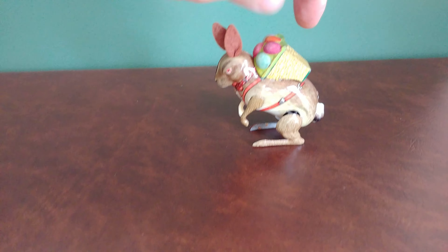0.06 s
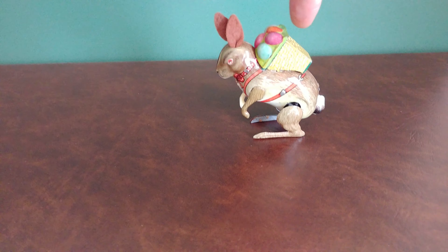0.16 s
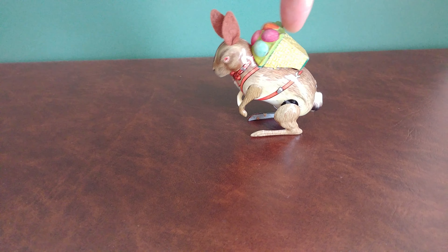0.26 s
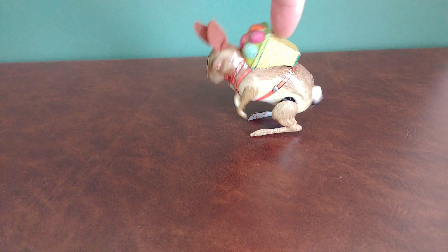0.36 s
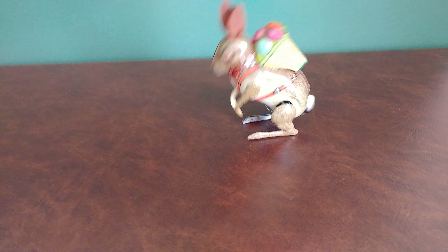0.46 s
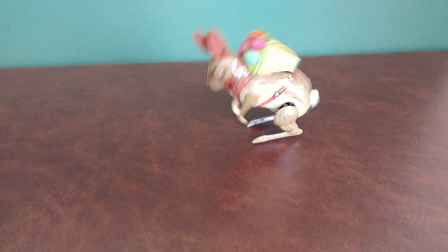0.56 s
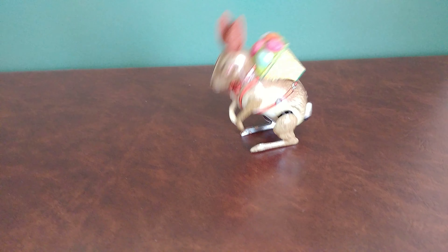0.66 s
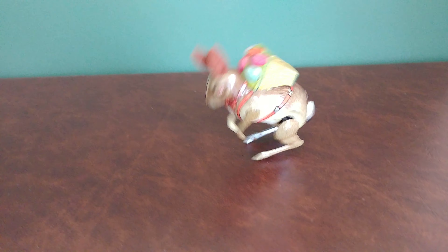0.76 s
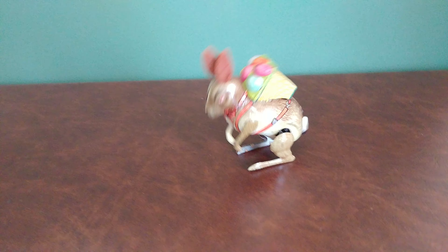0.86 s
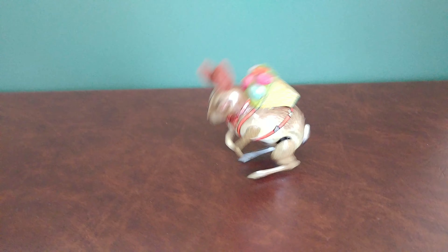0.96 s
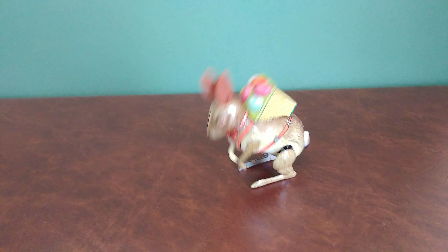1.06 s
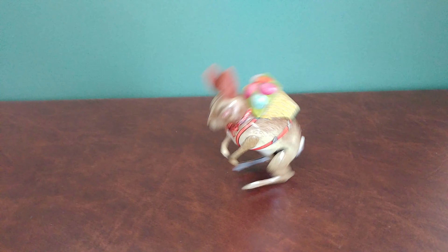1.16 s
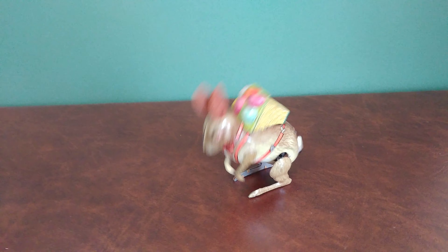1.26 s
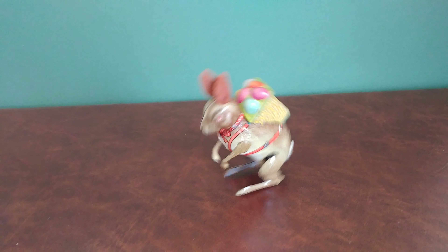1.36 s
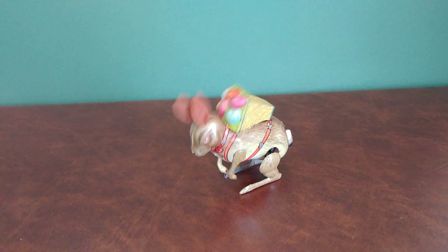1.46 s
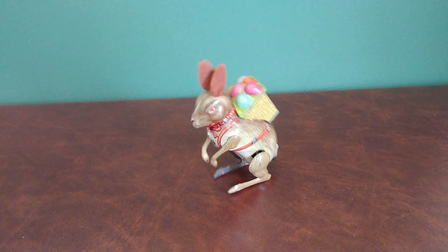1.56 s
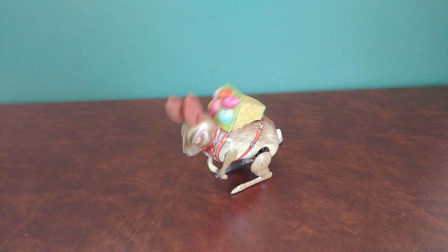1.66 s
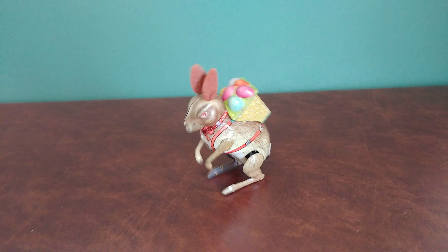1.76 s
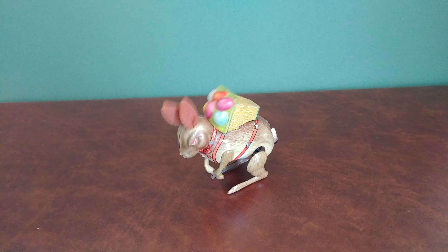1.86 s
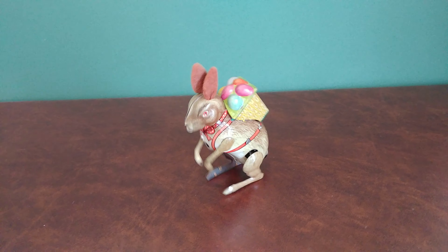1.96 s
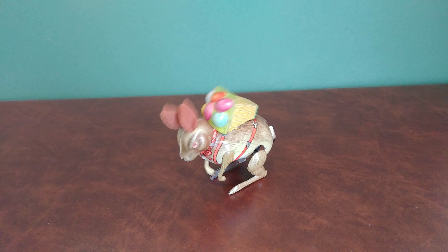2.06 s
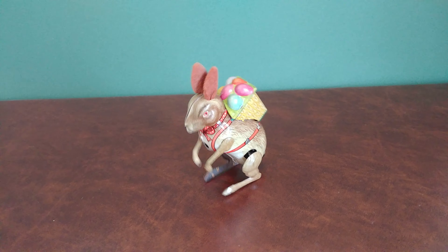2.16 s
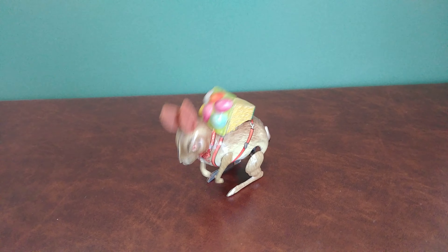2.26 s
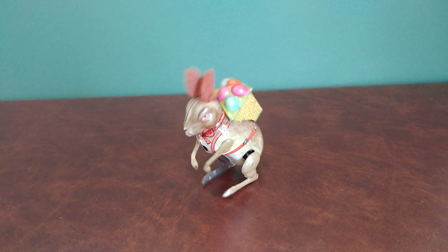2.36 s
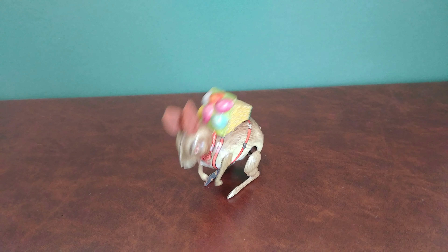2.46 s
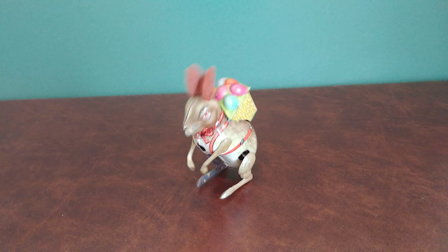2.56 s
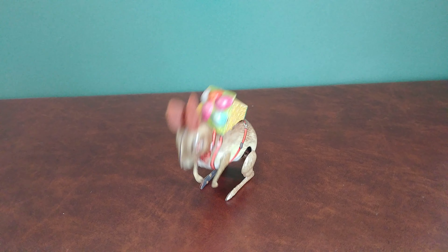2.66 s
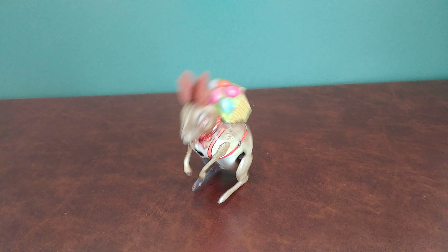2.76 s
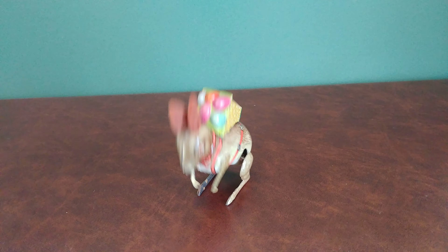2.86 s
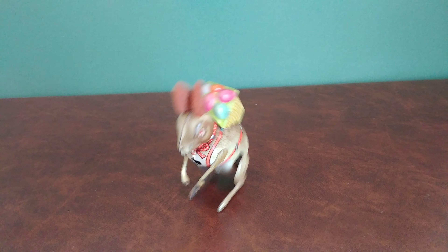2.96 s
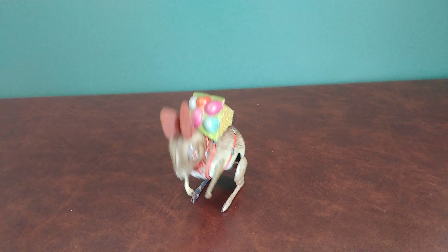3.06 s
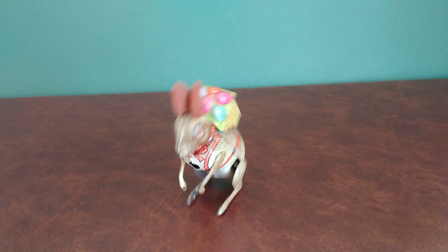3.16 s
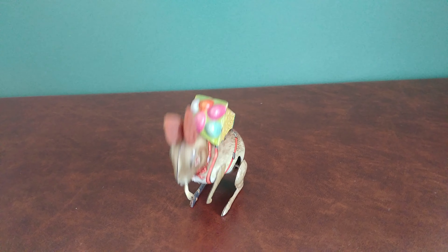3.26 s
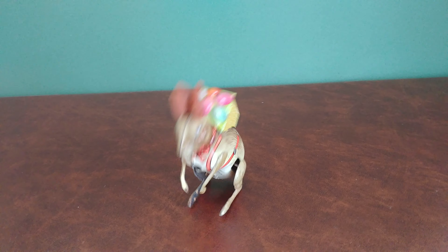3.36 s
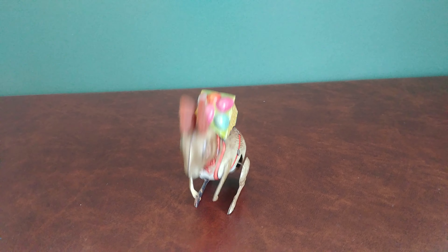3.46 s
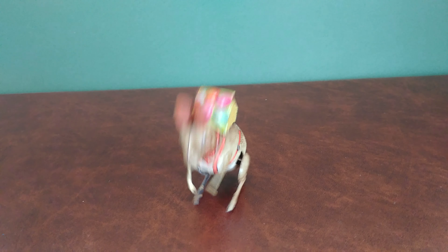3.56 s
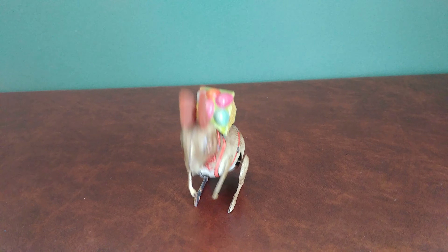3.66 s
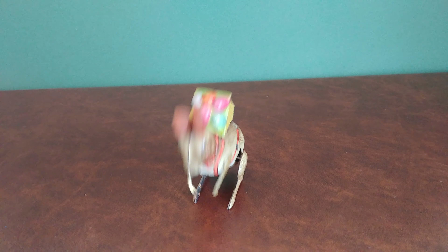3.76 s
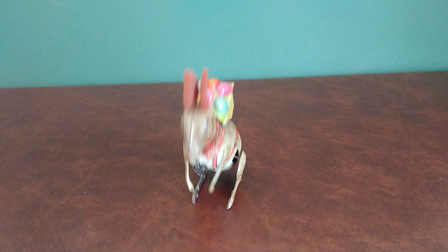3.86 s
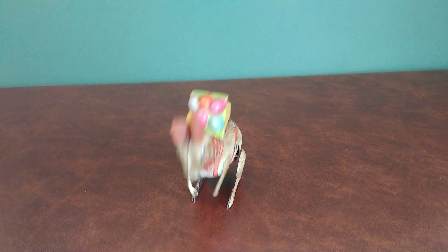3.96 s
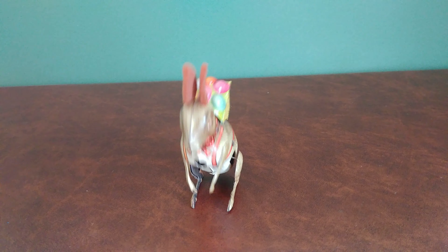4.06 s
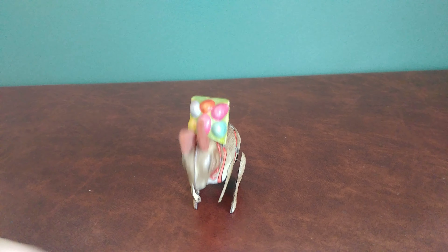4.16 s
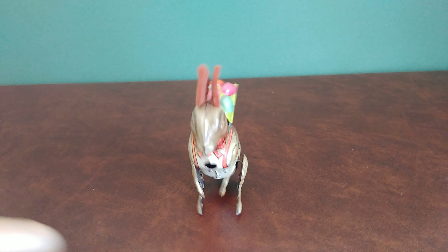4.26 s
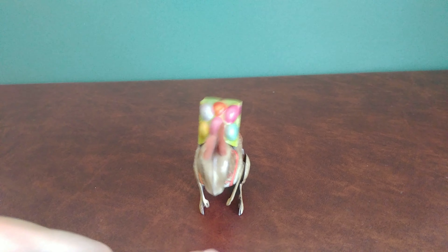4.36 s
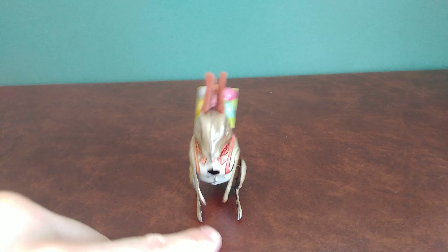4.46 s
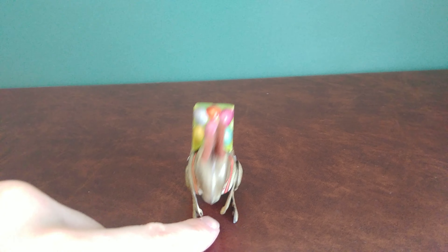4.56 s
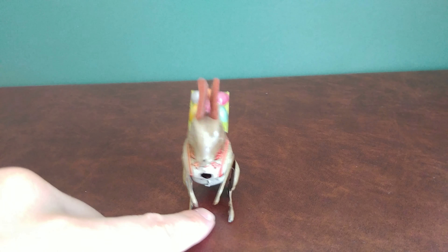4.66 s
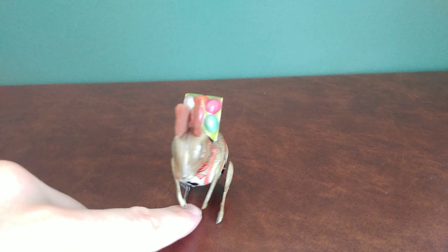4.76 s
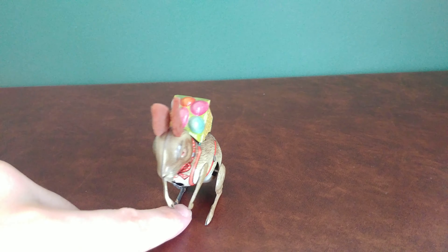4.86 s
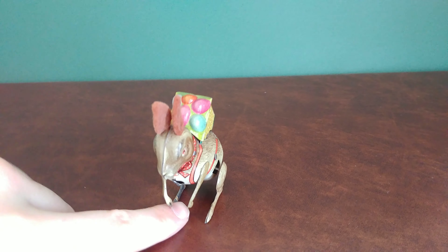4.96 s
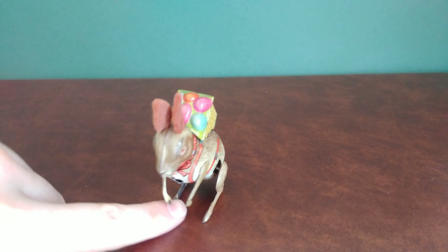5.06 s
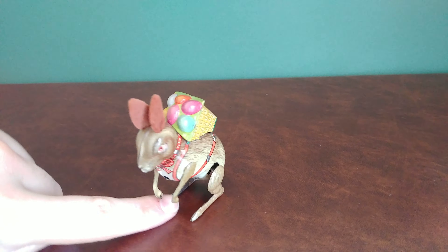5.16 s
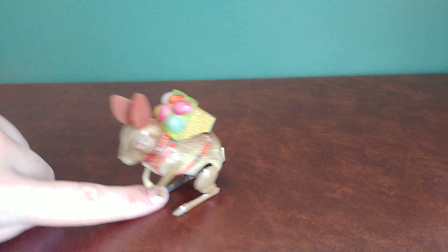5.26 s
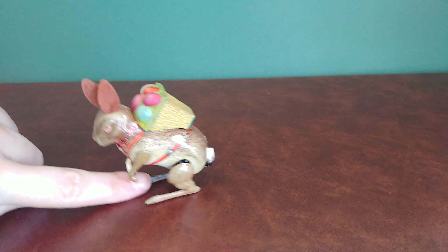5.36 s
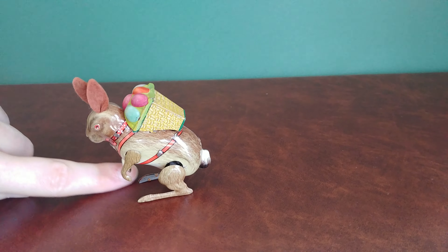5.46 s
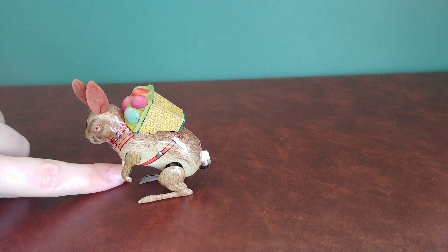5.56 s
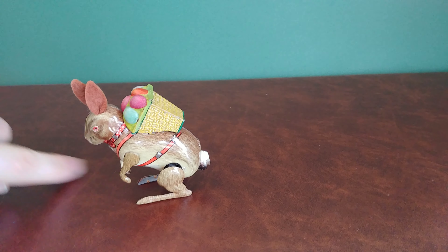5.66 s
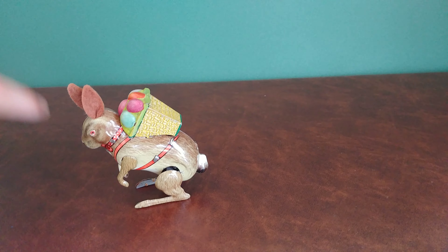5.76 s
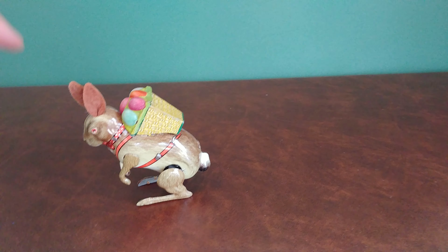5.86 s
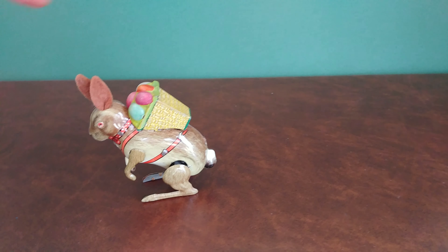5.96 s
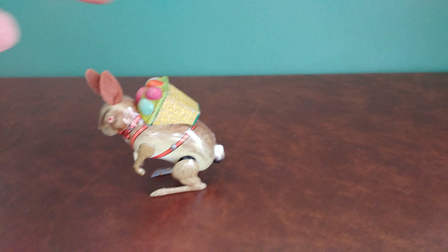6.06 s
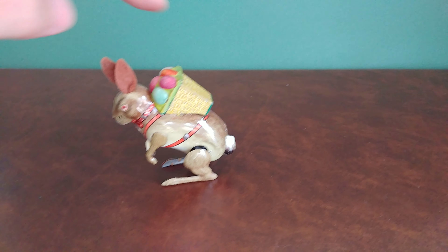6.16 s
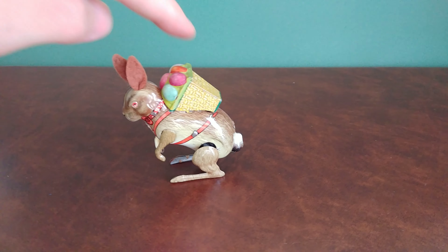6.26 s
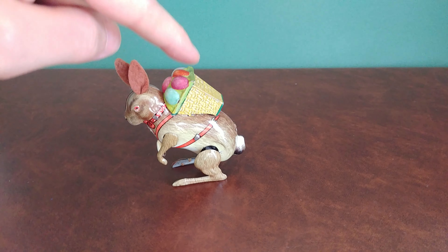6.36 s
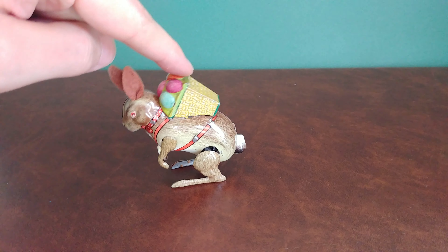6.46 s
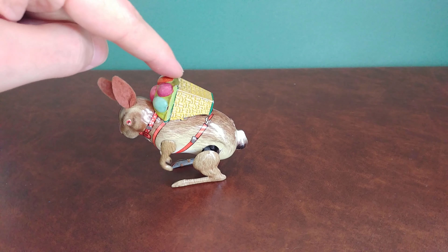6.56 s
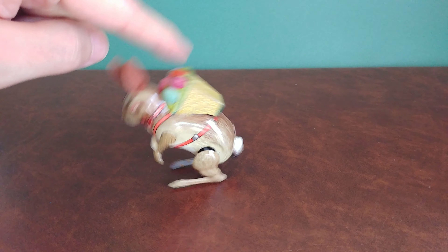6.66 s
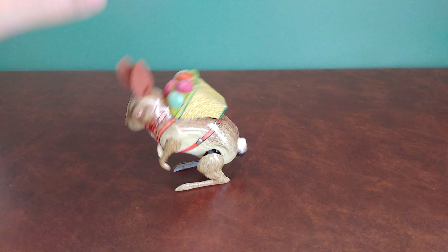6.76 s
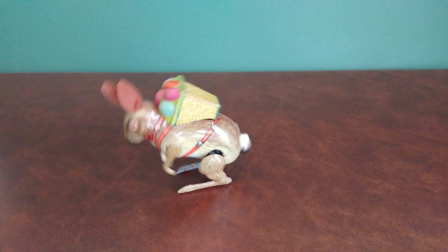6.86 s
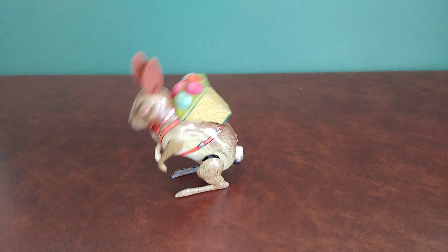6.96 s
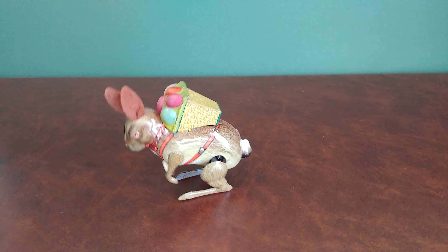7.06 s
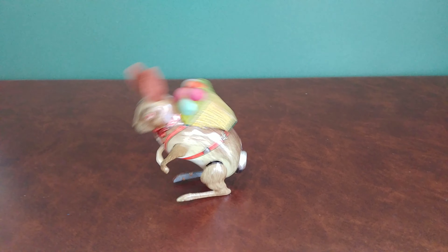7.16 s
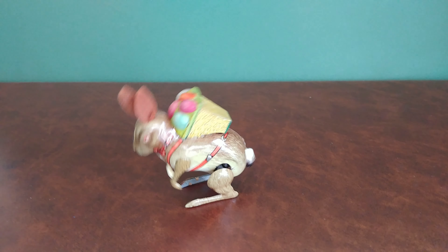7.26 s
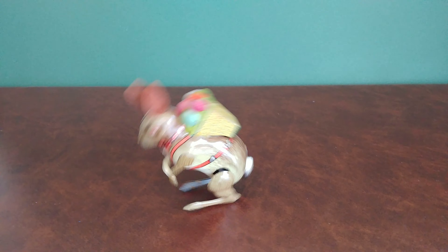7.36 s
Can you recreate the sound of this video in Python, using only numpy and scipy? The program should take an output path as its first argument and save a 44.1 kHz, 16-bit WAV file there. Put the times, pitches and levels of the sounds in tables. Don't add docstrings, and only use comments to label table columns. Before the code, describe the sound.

A clockwork tin rabbit hops on a wooden table in rapid double metallic clacks, is stopped by a finger, then restarts for four more hops.

```python
import sys
import numpy as np
from scipy import signal
from scipy.io import wavfile
from scipy.ndimage import uniform_filter1d

SR = 44100
rng = np.random.default_rng(int(sys.argv[2]) if len(sys.argv) > 2 else 0)


def unload_wav(signal):
    wavfile.write(
        sys.argv[1],
        SR,
        np.round(np.clip(np.atleast_2d(signal).T, -1, 1) * 32767).astype(np.int16),
    )


def magnitude_from_level(level_db):
    exponent = np.asarray(level_db, float) / 20
    return 10 ** exponent


N = 326781


# [t/s, level/dB]
SLAMS = [(0.4098, -10), (0.5986, -9), (0.7903, -9), (0.9869, -9), (1.1763, -8), (1.365, -10.5),
         (1.5471, -9.5), (1.7446, -9), (1.9422, -10.5), (2.1429, -10.5), (2.3536, -11.5), (2.5589, -12),
         (2.7691, -12), (2.9698, -10.5), (3.168, -12.5), (3.3772, -11.5), (3.5889, -10), (3.8087, -10),
         (4.021, -12.5), (4.233, -12), (4.4446, -13), (4.6624, -12.5), (6.6865, -12), (6.914, -11.5),
         (7.1664, -11), (7.3844, -13)]
# [top tin level/dB, low tin level/dB, wood knock level/dB, left over right level/dB]
SLAM_COLOUR = (-13, -17, -26.5, 3.5)


def leg_slams(toy):
    for k, row in enumerate(blows(SLAMS, SLAM_COLOUR, facing_share=0.26)):
        add(toy[(k + 1) % 3], *blow(row, chatter_s=0.016, rattle_db=-3.0, rattle_t60=0.23,
                                    ring_db=-26, rise_s=0.000088))


# [t/s, level/dB]
CLACKS = [(0.3405, -11), (0.5462, -13.5), (0.7355, -13.5), (0.9323, -14), (1.12, -12), (1.3069, -11),
          (1.4856, -11.5), (1.6905, -12.5), (1.8872, -13.5), (2.0862, -14.5), (2.2945, -17.5),
          (2.4965, -13.5), (2.7056, -15.5), (2.9073, -14), (3.1132, -13), (3.32, -15), (3.5305, -16),
          (3.748, -16.5), (3.9574, -15.5), (4.1697, -15.5), (4.3805, -14.5), (4.6017, -15.5), (6.5693, -13),
          (6.8551, -18), (7.1081, -17.5), (7.3241, -17)]
# [top tin level/dB, low tin level/dB, wood knock level/dB, left over right level/dB]
CLACK_COLOUR = (-13.5, -17.5, -24.5, 3)


def cam_clacks(toy):
    for k, row in enumerate(blows(CLACKS, CLACK_COLOUR, facing_share=0.77)):
        add(toy[k % 3], *blow(row, chatter_s=0.011, rattle_db=-10, rattle_t60=0.22,
                              ring_db=-28.0, rise_s=.0001))


# [t/s, level/dB, table pitch f/Hz]
THUDS = [(0.44, -29, 149), (0.628, -36, 141.7), (0.83, -25, 142), (1.017, -28.5, 146), (1.211, -26, 147),
         (1.408, -23, 147.5), (1.581, -27.5, 136), (1.778, -25.5, 151), (1.974, -29.5, 147.4),
         (2.174, -29, 143), (2.383, -29.5, 151), (2.585, -31, 150), (2.793, -28, 154), (3.005, -25, 139),
         (3.199, -27, 146), (3.392, -34, 146), (3.614, -29, 150), (3.831, -36, 148), (4.045, -28.5, 145),
         (4.255, -32, 154), (4.471, -29.5, 137.5), (4.688, -36.5, 136.4), (6.702, -33.5, 152),
         (6.936, -34, 153), (7.194, -31.5, 135)]


def landings(toy):
    for k, (s, db, hz) in enumerate(THUDS):
        add(toy[k % 3], *thud(s, db, hz))
        shake = (s + 0.007, .5 * db - 18.5, -8, -8, -14, 3.5)
        add(toy[k % 3], *blow(shake, chatter_s=0.041, rattle_db=1.0, rattle_t60=0.11,
                              ring_db=-34.0, rise_s=0.0013))


# [t/s, level/dB, top tin level/dB, low tin level/dB, wood knock level/dB, left over
# right level/dB]
SETTLING = [
    (4.7485, -34, -16, -16, -26, 2),
    (4.935, -45, -13, -26, -36, 1),
]


def settling(toy):
    for row in SETTLING:
        add(toy[0], *blow(row, chatter_s=0.018, rattle_db=0, rattle_t60=0.109,
                          ring_db=-48, rise_s=0.000298))


# [t/s, top tin level/dB, low tin level/dB, left over right level/dB]
FACING = [(.3, -2, 3.5, 1.5), (1.2, 0.2, 1.4, 0), (2.1, -5, -2.5, 2.5), (2.8, 2, 3.5, 0.3),
          (3.5, 3.5, -1.5, -3.5), (4.7, -1.3, -1.5, 0), (6.5, 5.5, -0.5, 0.7), (7.4, -4.5, -4, 5.5)]
# [top tin spread/dB, low tin spread/dB, wood knock spread/dB, left-right spread/dB]
SCATTER_DB = (1.8, 1.2, 1.8, 1.2)


def blows(table, colour, facing_share):
    s, db = np.transpose(table)
    at, top_db, low_db, pan_db = np.transpose(FACING)
    shade = colour + np.multiply(SCATTER_DB, rng.uniform(-np.sqrt(3), np.sqrt(3), (len(s), 4)))
    shade[:, 0] += facing_share * np.interp(s, at, top_db)
    shade[:, 1] += facing_share * np.interp(s, at, low_db)
    shade[:, 3] += facing_share * np.interp(s, at, pan_db)
    return np.column_stack([s, db, shade])


def blow(row, chatter_s, rattle_db, rattle_t60, ring_db, rise_s):
    s, blow_db, top_db, low_db, wood_db, pan_db = row
    t = np.arange(6144) / SR
    contacts = chatter_and_rattle(t, chatter_s, rattle_db, rattle_t60, rise_s)
    tin = tin_shell(s, t, contacts, top_db, low_db, pan_db, ring_db)
    return s - .0005, magnitude_from_level(blow_db) * (magnitude_from_level(-2.0) * tin + magnitude_from_level(wood_db - 2.5) * wood_knock(s, t))


def chatter_and_rattle(t, chatter_s, rattle_db, rattle_t60, rise_s):
    knocks_per_s = 1200
    uneven = magnitude_from_level(5.7 * np.minimum(rng.exponential(1, len(t)), 2))
    knocks = (rng.random(len(t)) < knocks_per_s / SR) * uneven
    knocks[4] = magnitude_from_level(4.0)
    lumps = evened(1.7 + signal.lfilter([1], [1, -np.exp(-1 / SR / 0.00083)], knocks))
    chatter = lumps * (1 - np.exp(-t / rise_s)) * np.exp(-t / 0.01 - (t / chatter_s) ** 3)
    clumps = magnitude_from_level(1.3 * evened(uniform_filter1d(rng.standard_normal(len(t)), 400)))
    rattle = lumps ** 0.64 * clumps * magnitude_from_level(rattle_db - 60 * t / rattle_t60 - 10 * (t / 0.24) ** 4)
    grit = rng.standard_normal((3, len(t)))
    thin = signal.sosfilt(signal.butter(1, 1800, "high", fs=SR, output="sos"), grit * rattle)
    drives = np.array([grit * chatter + thin, grit * chatter + 0.76 * thin])
    both, left, right = drives.transpose(1, 0, 2)
    late = np.roll(both, rng.integers(2, 6), axis=1)
    return np.array([both + .95 * left, late + .95 * right])


# [f/Hz, level/dB per Hz]
TIN = [(530, -30), (900, -7.5), (1280, -11), (1810, -7), (2580, -5.5), (6480, -3.5), (8400, -4),
       (10000, -16), (10550, -19.5), (11300, -11), (12700, -4), (14300, -3), (15700, -7.5), (16500, -64)]
# [f/Hz, level/dB, t60/s]
RINGS = [(1840, -4, .05), (2615, 1, .05), (2920, -6, .035), (3940, -1, .018), (5310, -3, .018),
         (6520, 1, .02), (7540, -3, .016), (13000, -6, .02), (15210, 4.5, .065), (15730, 1, .04)]
# [t/s, low ring level/dB]
FLANK = [(.3, -9), (2.3, -8), (2.8, -5), (3.5, -8), (4.7, -6), (6.5, 2.5), (7.4, 2.5)]


def tin_shell(s, t, contacts, top_db, low_db, pan_db, ring_db):
    hz = np.fft.rfftfreq(1024, 1 / SR)
    tilt = [(2500, low_db + 12.0), (4200, 0.029), (9500, 0.026), (11500, top_db + 4.5)]
    broad = causal(read(TIN, hz) + read(tilt, hz))
    flank = [(3000, np.interp(s, *np.transpose(FLANK))), (4500, 0.0027)]
    modes = [(f, db + read(tilt, f) + read(flank, f), t60) for f, db, t60 in RINGS]
    luck = rng.uniform(-1.7, 1.867, (len(RINGS), 3))
    ringing = magnitude_from_level(ring_db) * ring(modes, t[:3072], luck, spread_db=3.5)
    bodies = [broad / np.linalg.norm(broad), ringing]
    tin = sum(signal.fftconvolve(contacts[:, k], body[None], axes=1)[:, :len(t)]
              for k, body in enumerate(bodies))
    onset_rms = np.sqrt(np.mean(tin[:, :400] ** 2, axis=1, keepdims=True))
    tin *= magnitude_from_level([[pan_db / 2], [-pan_db / 2]]) / onset_rms
    low = signal.sosfilt(signal.butter(2, 2180, fs=SR, output="sos"), tin)
    return tin + low * (magnitude_from_level([[-pan_db / 2], [pan_db / 2]]) - 1)


# [f/Hz, level/dB, t60/s]
WOOD = [(63.6, 1.5, 0.14), (104.2, -0.5, 0.04), (150, 2, 0.15), (256, -4, 0.085), (345, 3.5, 0.095),
        (413, -3, 0.052), (507, 0, 0.098), (674, 2, 0.05), (806.5, -2, 0.054), (915, -3.5, 0.076)]
# [t/s, 255 Hz over 345 Hz mode level/dB]
PLACE = [(.3, 14.5), (1.5, 6), (2.5, 5.5), (3.5, -0.5), (4.7, -0.5), (6.5, 13.5), (6.7, -9.5), (7.4, -1)]


def wood_knock(s, t):
    place_db = np.interp(s, *np.transpose(PLACE))
    answer = [(150, 0.019), (255, place_db), (345, -place_db), (500, 0.013)]
    table = [(f, db + read(answer, f), t60) for f, db, t60 in WOOD]
    lucks = rng.uniform(-1.633, 1.7, (2, len(WOOD), 3))
    here, there = (ring(table, t, luck, spread_db=5.0) for luck in lucks)
    apart = .5 * there
    return (1 - np.exp(-t / 0.00089)) * np.array([here + apart, here - apart])


def thud(s, db, hz):
    t = np.arange(5000) / SR
    swell = (t / .011) ** 2.7 * np.exp(2.0 * (1 - t / 0.0095))
    boom = swell * np.sin(2 * np.pi * hz * t)
    modes = ring(WOOD[:6], t, rng.uniform(-1.85, 1.7, (6, 3)), spread_db=1.5)
    others = (1 - np.exp(-t / 0.0006)) * modes
    return s - .003, magnitude_from_level(db + 3.0) * (boom + magnitude_from_level(-21.5) * others) * np.ones((2, 1))


# [t/s, level/dB]
POPS = [(0.4107, -26.5), (0.791, -44), (1.7441, -46), (2.3529, -15), (3.1708, -13.5), (3.3793, -12.5),
        (3.5894, -9), (3.8089, -11.5), (4.0207, -5), (4.2345, -11.5), (6.9158, -24.5)]
POP_SIGNS = [1, 1, 1, -1, 1, 1, -1, 1, -1, 1, 1]
# [t/s, level/dB]
SECOND_STEPS = [
    (3.616, -27.5),
    (4.246, -22),
]


def overload_steps():
    steps, t = np.zeros((2, N)), np.arange(SR // 4) / SR
    creep = 1 - .87 * np.exp(-t / .0016)
    settle = creep * np.exp(-t / .06) * np.cos(2 * np.pi * t) ** 2
    for (s, db), sign in zip(POPS + SECOND_STEPS, POP_SIGNS + [1, 1]):
        add(steps, s, sign * magnitude_from_level(db + 10.5) * settle * [[0], [1]])
    return steps


# [start t/s, swell t/s, fade t/s, top level/dB]
STROKES = [
    (.24, 0.079, 0.039, -60.5),
    (4.98, 0.39, 0.065, -62),
    (5.33, .05, 0.039, -55),
    (5.38, .075, .05, -56),
    (6.049, .25, .2, -75.5),
    (6.44, 0.016, 0.065, -77),
    (6.531, 0.024, 0.0068, -71),
]


def rubbing():
    t, hz = np.arange(N) / SR, np.fft.rfftfreq(1024, 1 / SR)
    ends = [-13.5, 0, -13.5]
    stroke = np.max([db + np.interp(t, [s, s + swell, s + swell + fade], ends, left=-99, right=-99)
                     for s, swell, fade, db in STROKES], axis=0)
    patches = magnitude_from_level(2.8 * evened(uniform_filter1d(rng.standard_normal(N), 300)))
    grit = rng.standard_normal((2, N)) * patches
    tilt = [(1500, 5.5), (2600, 2.5), (8500, 2.5), (11000, -11.5), (14000, -15.5)]
    shell = causal(read(TIN, hz) + read(tilt, hz))
    return magnitude_from_level(stroke) * evened(signal.oaconvolve(grit, shell[None], axes=1)[:, :N])


# [from t/s, to t/s]
SQUEAK_S = (6.13, 6.38)


def squeak():
    (start, end), hz, db = SQUEAK_S, 4110, -76
    t, out = np.arange(round((end - start) * SR)) / SR, np.zeros((2, N))
    waver = 1 + 0.013 * evened(uniform_filter1d(rng.standard_normal(len(t)), 600))
    whine = np.sin(2 * np.pi * np.cumsum(hz * waver) / SR)
    add(out, start, magnitude_from_level(db) * np.hanning(len(t)) * whine * np.ones((2, 1)))
    return out


# [f/Hz, t60/s]
ROOM = [(150, 0.51), (700, 0.28), (2000, 0.25), (5000, 0.27), (13000, .17)]


def room(x):
    taps = np.zeros((2, SR // 2))
    slots = np.arange(200, SR // 2 - 20, 10)
    at = slots + rng.integers(0, 10, (2, len(slots)))
    np.put_along_axis(taps, at, rng.choice([-1., 1.], at.shape), 1)
    hz, t, z = signal.stft(taps, SR, nperseg=256)
    tail = signal.istft(z * magnitude_from_level(-60 * t / read(ROOM, hz)[:, None]), SR, nperseg=256)[1]
    return signal.fftconvolve(x, tail / np.linalg.norm(tail[0]), axes=1)[:, :N]


# [f/Hz, level/dB per Hz]
AIR = [(20, -0.5), (50, 4), (62, -9.5), (99, 4), (160, -5), (200, -18), (310, -9), (500, -12.5),
       (1000, -22), (2000, -25), (4000, -28), (8000, -35.5), (10500, -44.5), (13000, -35.5), (16500, -42.5)]
# [f/Hz, correlation/1]
SAME = [(60, 0.38), (240, 0.84), (950, 0.55), (3770, -0.11), (15000, -0.11)]


def hush():
    frames, hz = N // 512 + 5, np.fft.rfftfreq(2048, 1 / SR)
    a, b, c, d, patches = rng.standard_normal((frames, 1025, 5)).T
    patches = evened(uniform_filter1d(uniform_filter1d(patches, 10, 0), 8, 1))
    same, left = np.clip(read(SAME, hz), -1, 1)[:, None], a + 1j * b
    right = same * left + np.sqrt(1 - same ** 2) * (c + 1j * d)
    z = np.array([left, right]) * magnitude_from_level(read(AIR, hz)[:, None] + 1.5 * patches)
    noise = evened(signal.istft(z, nperseg=2048, noverlap=1536)[1][:, :N])
    return magnitude_from_level(-56) * magnitude_from_level([[2.2], [-1.2]]) * noise


def evened(x):
    return x / np.sqrt(np.mean(x ** 2) + 1e-20)


def read(points, hz):
    f, value = np.transpose(points)
    return np.interp(np.log(hz + 1), np.log(f + 1), value)


def add(mix, s, sound):
    part = mix[:, round(s * SR):][:, :sound.shape[1]]
    part += sound[:, :part.shape[1]]


def causal(db, size=1024):
    log_gain = np.log(magnitude_from_level(np.maximum(np.concatenate([db, db[-2:0:-1]]), -90)))
    return np.fft.ifft(np.exp(np.conj(signal.hilbert(log_gain)))).real[:size // 2]


def ring(modes, t, luck, spread_db):
    hz, db, t60 = np.transpose(modes)[:, :, None]
    share = magnitude_from_level(db + spread_db * luck[:, :1] - 60 * t / t60)
    detuned = hz * (1 + 0.0022 * luck[:, 1:2])
    return (share * np.sin(2 * np.pi * (detuned * t + luck[:, 2:]))).sum(0)


def scene():
    toy = np.zeros((3, 2, N))
    leg_slams(toy)
    cam_clacks(toy)
    landings(toy)
    settling(toy)
    hops = sum(part + magnitude_from_level(-12.5) * room(part) for part in toy)
    return hops + rubbing() + squeak() + hush()


def top_cut(x):
    return signal.sosfilt(signal.butter(12, 17000, fs=SR, output="sos"), x)


def record(dry):
    bass_cut = signal.butter(8, 65, "high", fs=SR, output="sos")
    limited = np.clip(signal.sosfilt(bass_cut, dry + overload_steps()), -.88, .88)
    band = signal.firwin(511, 15950, window=("kaiser", 9), fs=SR)
    mix = signal.oaconvolve(limited, band[None], "same")
    return top_cut(mix)


dry = scene()
out = record(dry)
unload_wav(out)
```